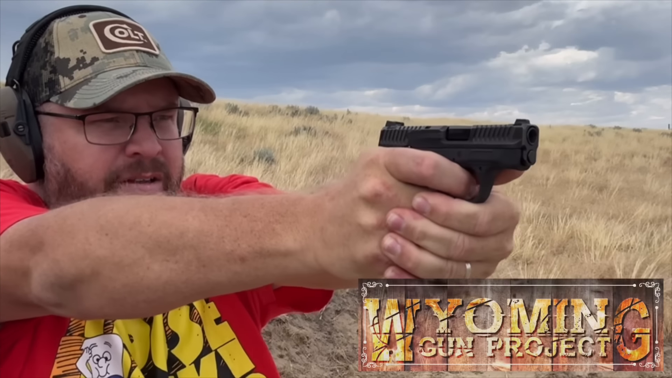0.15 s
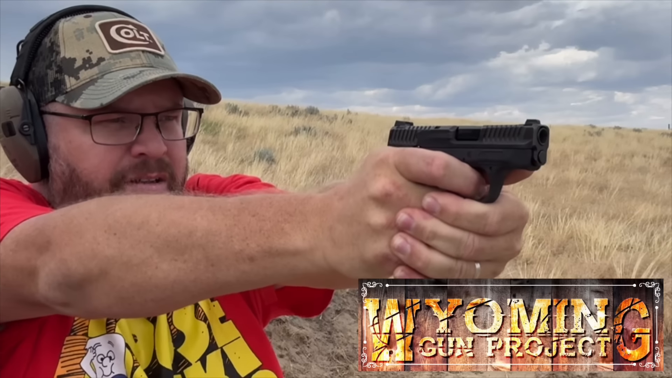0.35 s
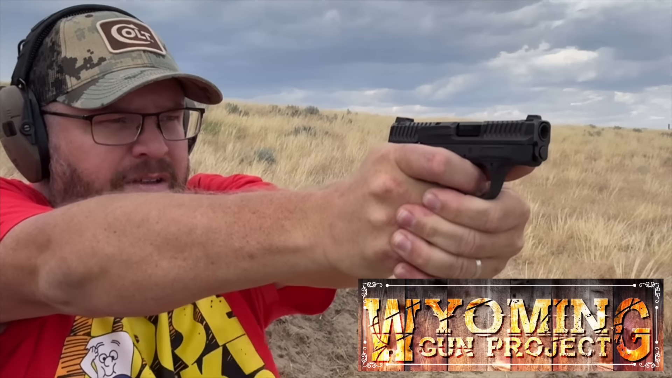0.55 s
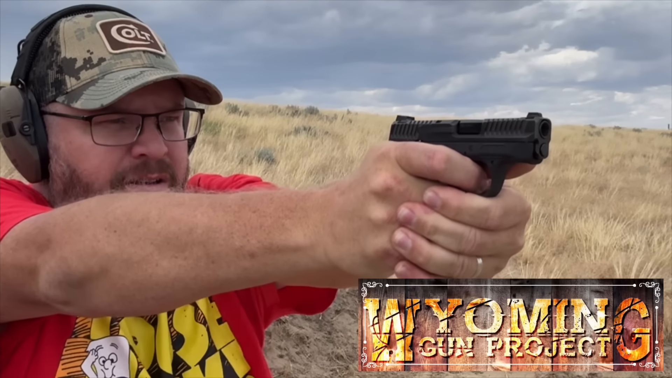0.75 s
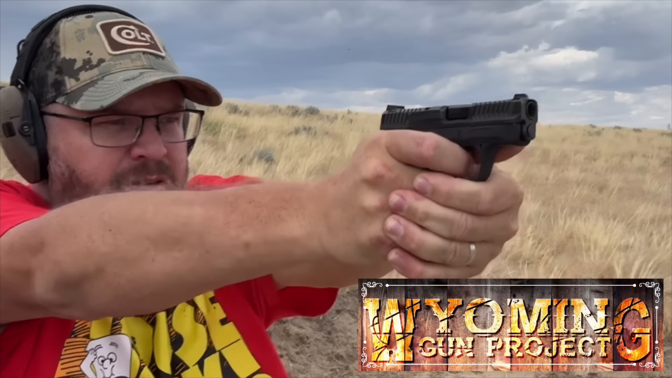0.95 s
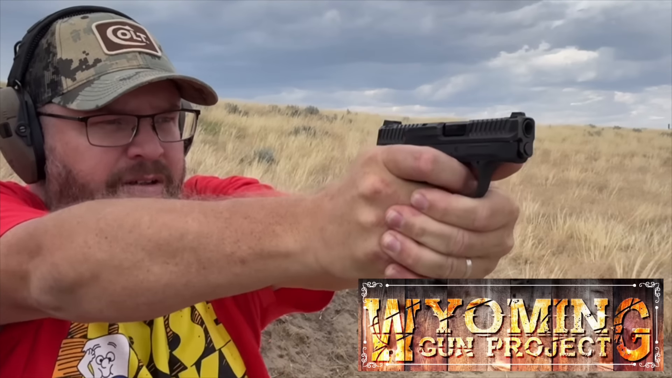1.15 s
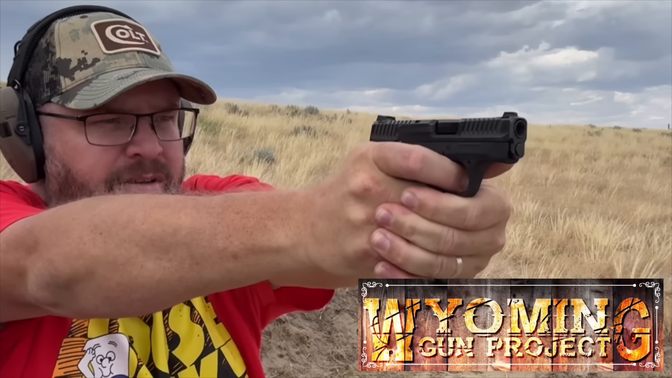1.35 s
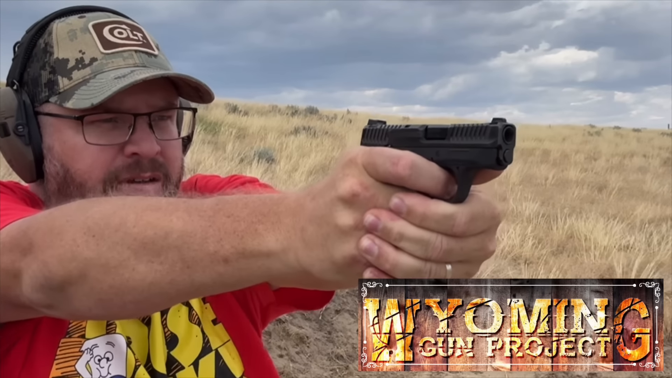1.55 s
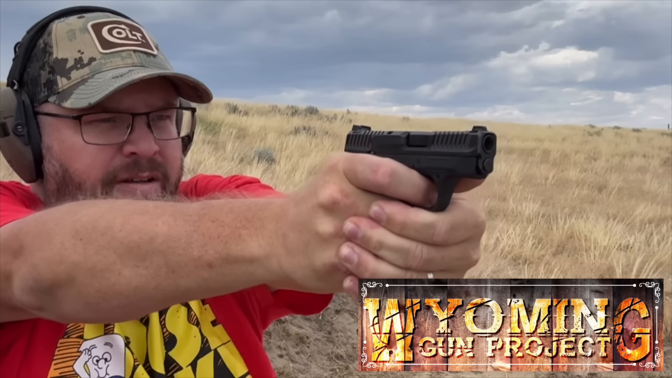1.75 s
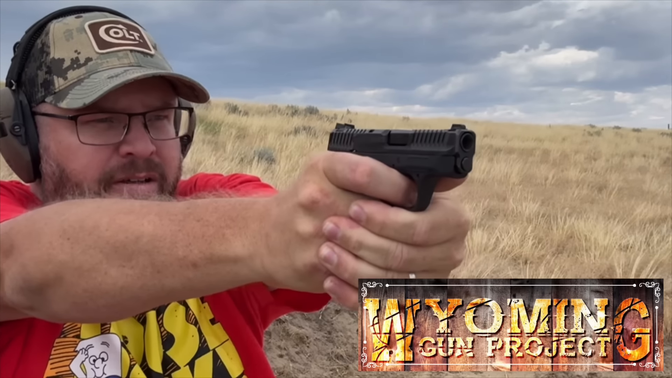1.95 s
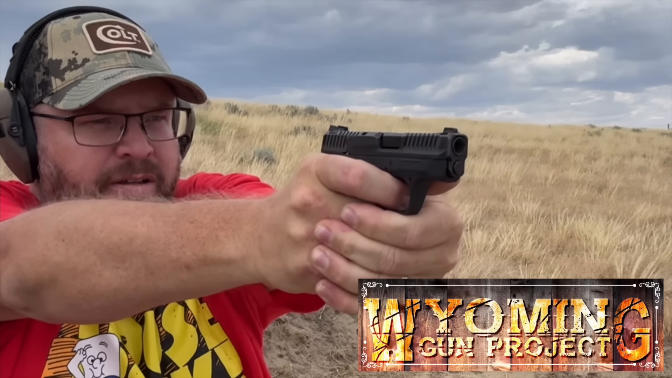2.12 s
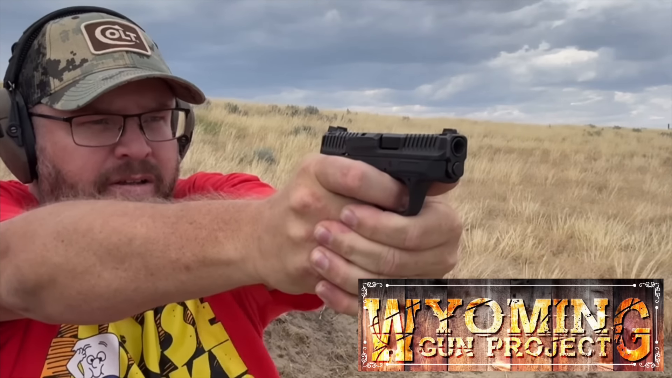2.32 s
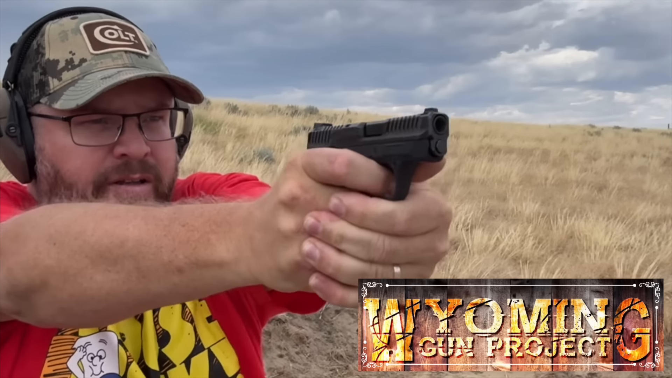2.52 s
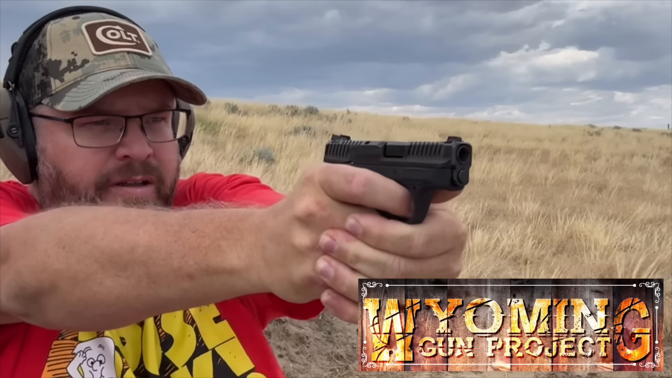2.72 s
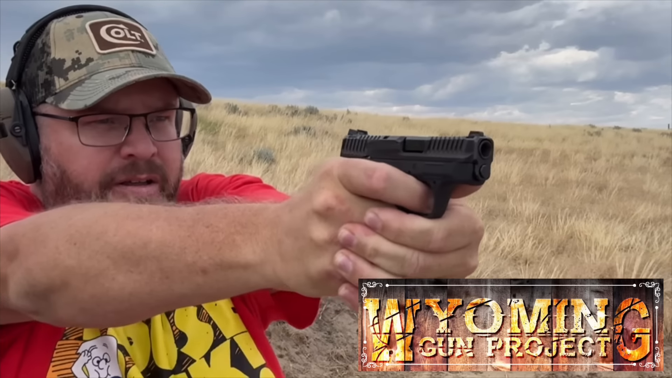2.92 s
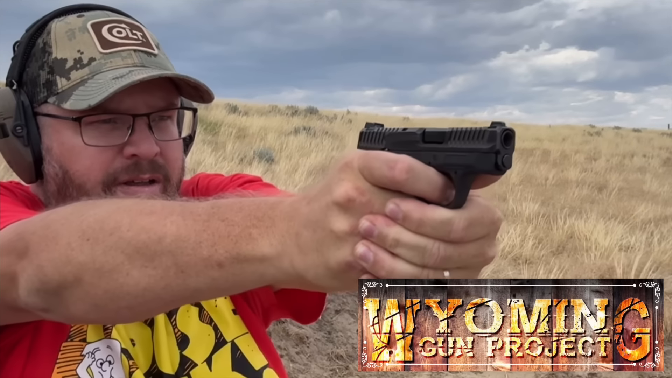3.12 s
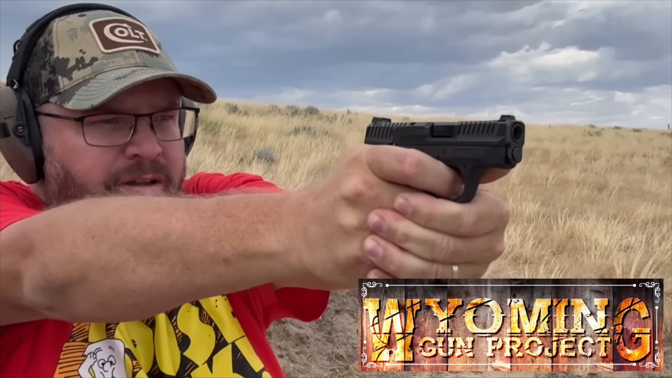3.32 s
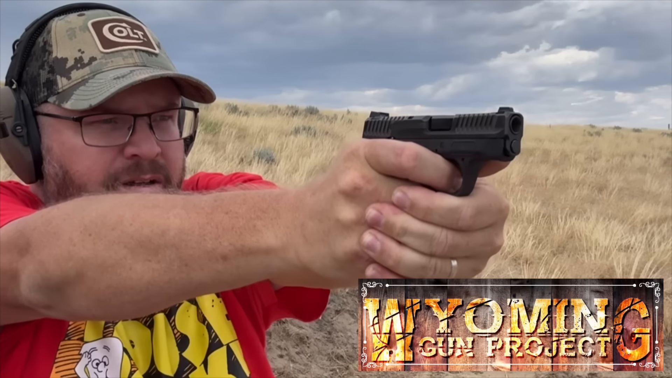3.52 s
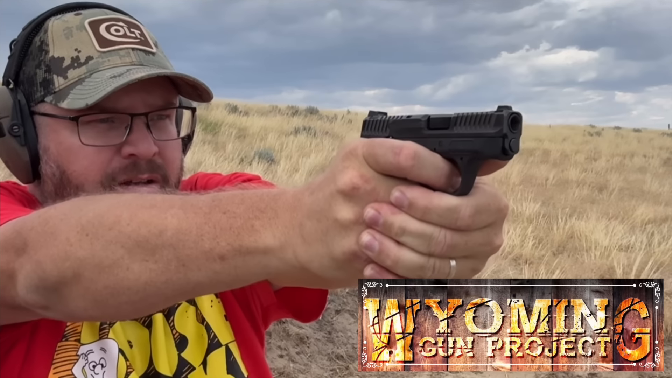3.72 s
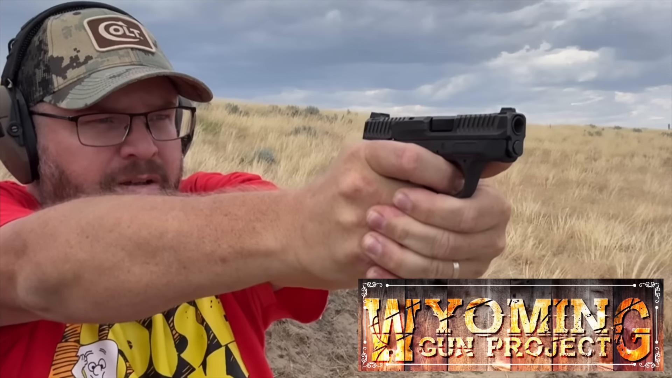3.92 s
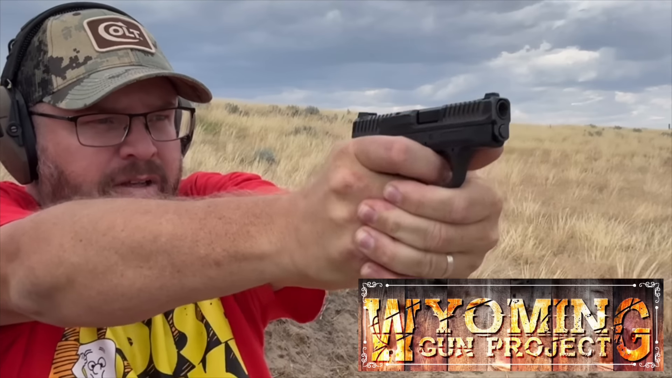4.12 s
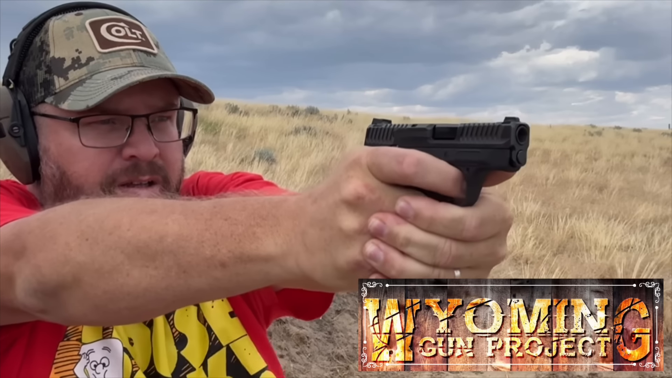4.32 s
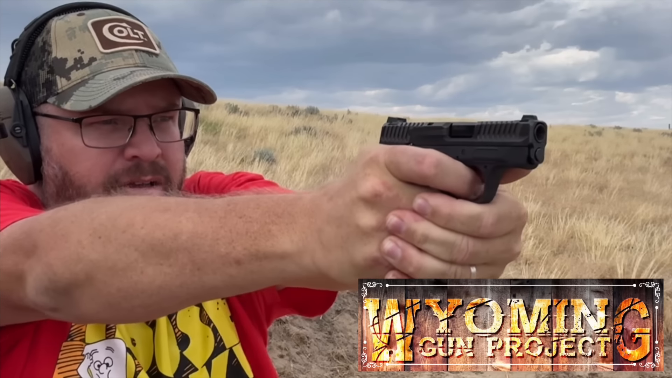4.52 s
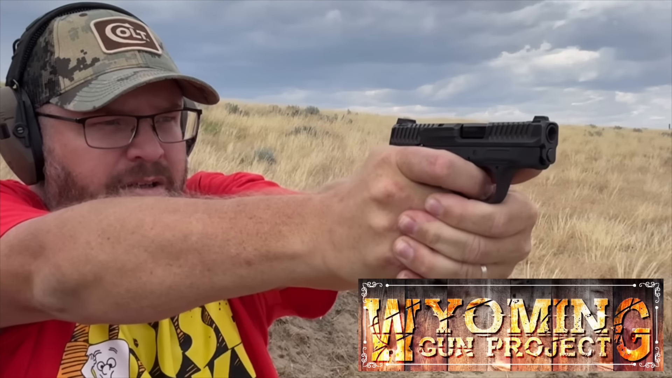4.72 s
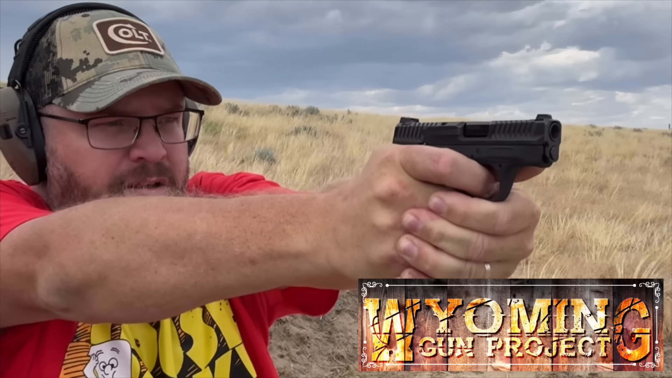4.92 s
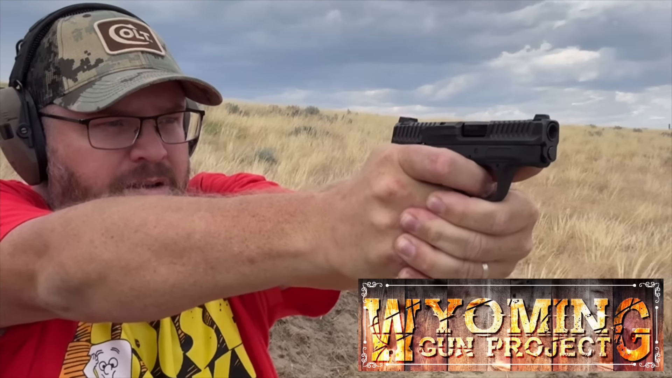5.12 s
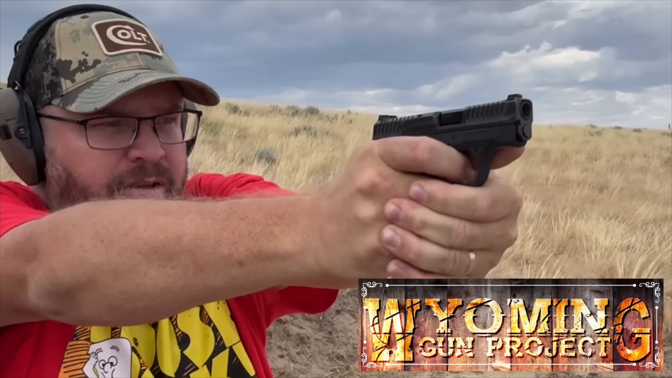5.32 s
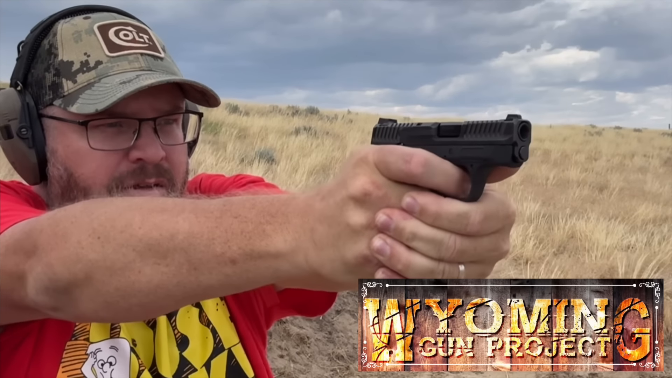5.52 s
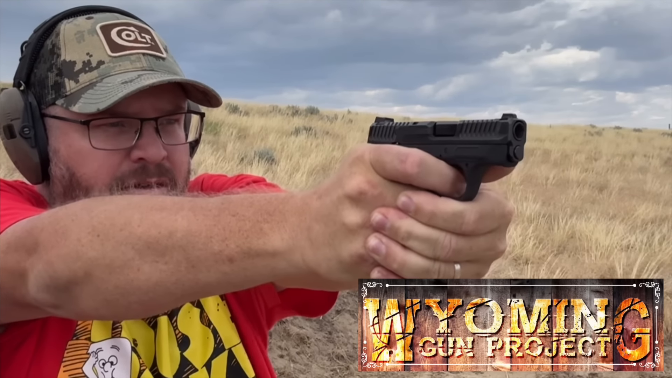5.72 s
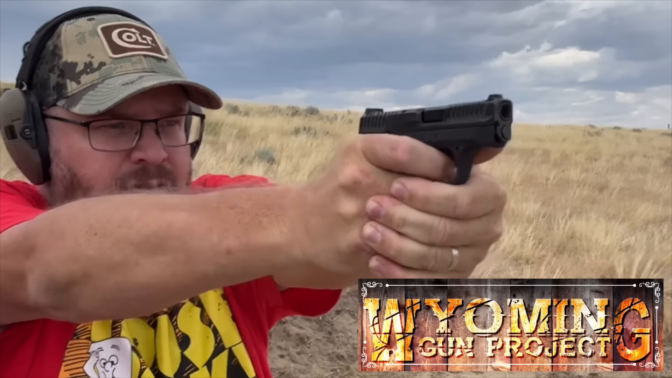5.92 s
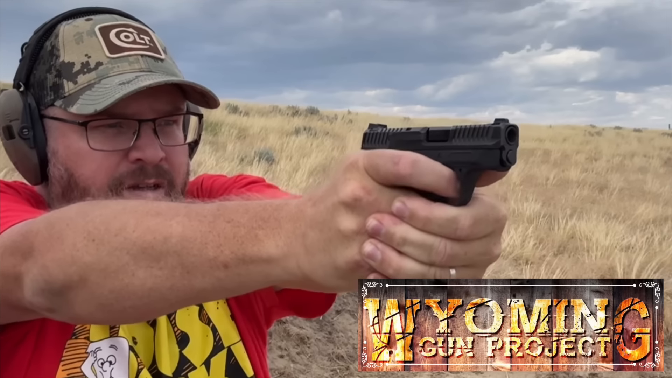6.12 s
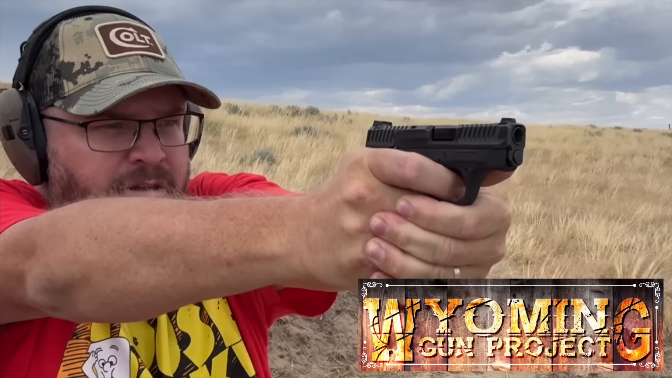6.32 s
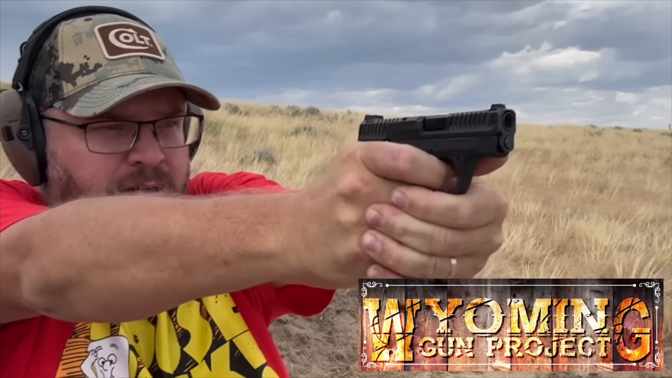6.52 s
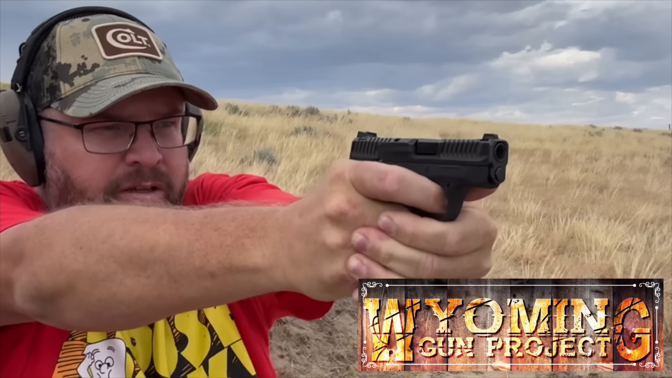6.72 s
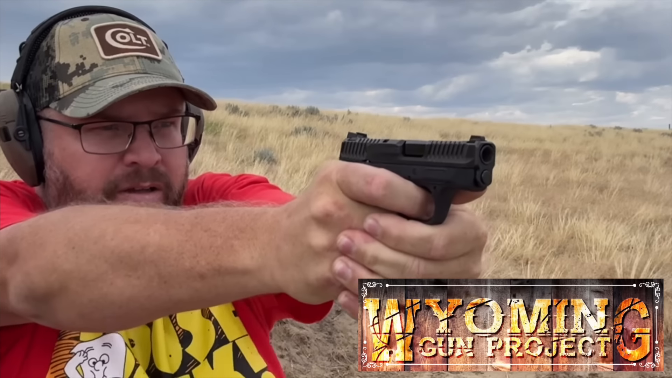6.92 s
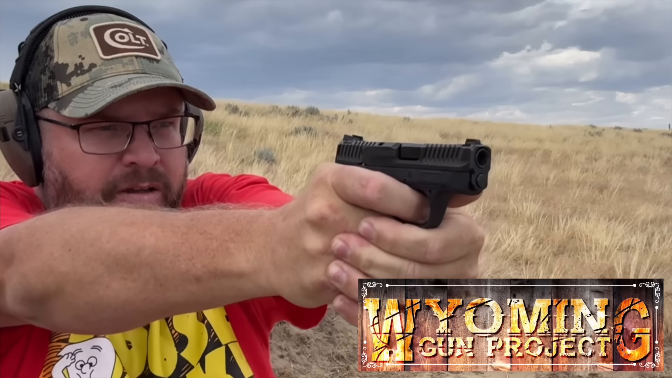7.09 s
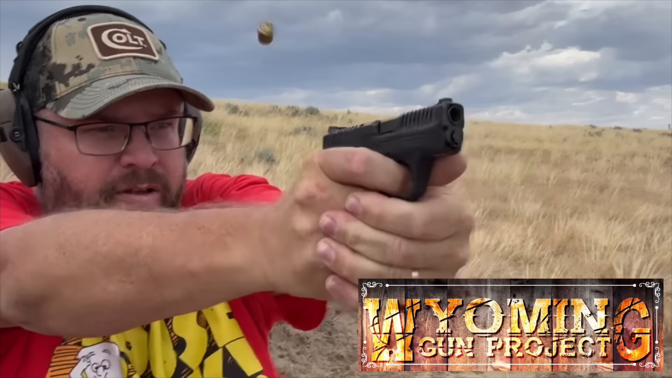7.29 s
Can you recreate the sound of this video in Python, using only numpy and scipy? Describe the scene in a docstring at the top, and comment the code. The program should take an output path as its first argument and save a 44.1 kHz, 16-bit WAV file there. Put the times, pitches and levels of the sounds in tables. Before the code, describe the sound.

A pistol fires seven loud, sharp shots on open grassland, slowly at first and then quicker. Each blast slightly overloads the close microphone and slaps back briefly from the ground. Five shots are followed at once by the snap and bright ring of a steel plate; the second only grazes and the last has no ring. Spent cases tick lightly, and low wind gusts buffet the microphone between shots.

```python
"""Pistol shots at a steel plate

Seven shots on open grassland overload a small, close microphone; each blast scatters back from
the ground and a bank. Five bullets shatter on a steel plate and ring its modes, and one grazes
its frame. Spent cases and fragments tick on the ground; gusts buffet the microphone."""
import sys
import numpy as np
from scipy import signal
from scipy.fft import rfft, irfft
from scipy.io import wavfile

SR = 44100
rng = np.random.default_rng(int(sys.argv[2]) if len(sys.argv) > 2 else 0)


def digitize_waveform(pressure):
    """Quantize a signal to 16-bit integers and store it at the path in sys.argv[1].

    Rows of a 2-D input are taken as channels; values are limited to [-1, 1].
    """
    field = np.atleast_2d(pressure).T
    bounded = np.clip(field, -1, 1)
    quanta = np.round(bounded * 32767).astype(np.int16)
    wavfile.write(sys.argv[1], SR, quanta)


N = 324135

# Muzzle blasts. Each row: start in seconds, gain in dB.
SHOTS = [(.959, -1), (2.3886, -1.5), (3.9774, 0), (5.176, -1), (5.924, -1), (6.4824, -1), (7.3048, -1)]
# Returns from the ground and objects further off. Each row: delay in seconds, 60 dB rise time in
# seconds, t60 in seconds, low, middle and treble gain in dB.
SCATTER = [(.003, .006, .14, 2, 16.5, 3), (.034, .09, .103, 8, 9, -27), (.0855, .042, .345, -22, -46, -70),
           (.1168, .003, .0135, -14, -12, -38), (.1213, .008, .05, -23, -58, -23),
           (.1343, .018, .06, -16, -9, -16), (.1469, .095, .0146, -54, -13, -70),
           (.1757, .25, .075, -16, -26, -88), (.2206, .026, 1.6, -58, -59, -99)]
# Single echoes. Each row: delay in seconds, gain in dB, pitch in Hz.
ECHOES = [(.066, -6, 500), (.0705, -2, 701), (.0765, -4, 808), (.0935, -3, 802), (0.1164, -4.5, 851),
          (0.1188, -6, 752), (0.1239, -9, 772), (.1325, 9.5, 430), (0.1347, 11, 448.4), (.139, 9.5, 767.7),
          (.1428, -7.25, 550), (.147, -7.5, 439.4), (.182, -20.5, 605.6), (.268, -34, 420)]
# Blast spectra. Each row: frequency in Hz, relative density in dB.
BODY_SPECTRUM = [(35, -36), (60, -11.5), (194, -6), (424, -0.5), (557, 4), (994, 1), (1490, -3),
                 (1740, -14), (2170, -20), (2670, -33), (3500, -34.5), (4550, -59), (7700, -120)]
TREBLE_SPECTRUM = [(1180, -31), (2000, 0.5), (2770, -12), (4540, -8.5), (12100, -22), (15600, -27),
                   (16400, -48.5)]
FRESH_SHARE = 0.37  # part of the body noise that changes from shot to shot
ROLL_DB, ROLL_T60_S = -44, 1.1


def gun():
    """The same ground answers every blast, so most scatter and all echoes repeat; far land rolls."""
    delay, rise, t60, *bands_db = np.transpose(SCATTER)[:, :, None]
    t = np.arange(-.002, .4, 1 / SR)
    shape_db = -60 * np.maximum((delay - t) / rise, (t - delay) / t60)
    shape_db = np.minimum(shape_db, 60 * (t - delay[0]) / rise[0])  # nothing returns before the blast
    envelopes = [gain_of(db + shape_db).sum(0) for db in bands_db]
    ground, echoes, out = noise(BODY_SPECTRUM, len(t)), np.zeros(len(t)), np.zeros(N)
    for lag, db, hz in ECHOES:
        add(echoes, lag - t[0], gain_of(db) * burst(hz, cycles=1.6))
    roll_db = ROLL_DB - 60 * np.arange(SR) / SR / ROLL_T60_S
    for start, db in SHOTS:
        body = np.sqrt(1 - FRESH_SHARE ** 2) * ground + FRESH_SHARE * noise(BODY_SPECTRUM, len(t))
        low = signal.filtfilt(*signal.butter(2, 750, fs=SR), body)
        bands = low, body - low, noise(TREBLE_SPECTRUM, len(t))
        scatter = sum(band * envelope for band, envelope in zip(bands, envelopes))
        add(out, start + t[0], gain_of(db) * (scatter + echoes))
        add(out, start, gain_of(db + roll_db) * noise(ROAR_SPECTRUM, SR))
    return out


# Hits on the plate. Each row: start in seconds, pitch factor.
HITS = [(1.119, 1.0008), (4.1333, .9998), (5.334, 1.0005), (6.0865, .9988), (6.643, .9995)]
# Ring length in seconds for each hit.
RING_S = [1.2, .95, .7, .5, .59]
# Plate mode frequencies in Hz.
MODE_HZ = [925, 970, 1550, 1562, 2078, 2440, 2710, 2920, 3171, 3957, 4412, 4567, 5290, 5654, 6182, 6650,
           6971, 7308, 7585, 7888, 8086, 8690, 8865, 9372, 9845, 10968, 11348, 11775, 12470, 15090]
# Ring of each mode. Each row: t60 in seconds, then excitation in dB for each of the five hits.
MODE_RING = [(0.14, -41, -14, -5, -24, -20.5), (1.2, -43, -55.5, -54, -52, -48),
             (0.9, -38.5, -13.5, -30.5, -8, -15.5), (0.82, -13, -19.5, -5, -28, -16),
             (4.3, -52, -63.5, -64, -15.5, -56.5), (1.1, -30, -61.5, -39.5, -35, -26),
             (0.3, -45, -52, -42, -49, -30), (0.8, -25, -43.5, -64.5, -38, -31.5),
             (0.48, -18.5, -42.5, -58.5, -35, -31.5), (0.35, -14.5, -21, -19.5, -37.5, -15.5),
             (0.75, -33, -32, -42, -27, -19), (0.25, -23, -15, -13, -17, -7),
             (0.29, -20, -30, -40, -24, -18), (0.35, -18.5, -23, -41, -30, -17),
             (0.2, -19, -33.5, -24, -26, -13.5), (0.24, -9, -30, -38.5, -23, -20),
             (0.32, -10.5, -29.5, -34.5, -8.5, -8), (1.0, -16, -50.5, -29.5, -17.5, -12.5),
             (0.17, -40, -40.5, -37, -23, -26.5), (0.22, -13.5, -27.5, -21, -20, -4),
             (0.067, -22.5, -34, -14, -37.5, -8.5), (0.15, -35, -35, -16, -29, -34.5),
             (0.2, -37.5, -34, -40, -17.5, -17.5), (0.54, -16, -60.5, -48, -28, -6.5),
             (0.5, -42, -55, -42.5, -34.5, -60.5), (0.55, -30, -60.5, -33, -37, -40),
             (0.4, -28, -50.5, -42, -34, -22), (0.4, -36, -40, -53.5, -72, -36),
             (0.24, -55.5, -48, -48, -87.5, -51), (0.25, -30.5, -40.5, -47.5, -57.5, -70.5)]
# Ring contour per hit, before each mode's weight. Each row, for low then high modes: offset in dB,
# early fade time in seconds, early fade in dB, waver rate in Hz, depth in dB, phase in cycles.
CONTOURS = [
    [(5, .27, -20, 4.06, 5, .41), (-5.5, .5, -24, 5.5, 2.5, .06)],
    [(-6, .5, -9, 1.45, 9, .88), (-4.5, .42, -26.5, 3.5, 4.3, .39)],
    [(-5.5, .46, -19.5, 4.9, 2, .82), (-2, .44, -13, 4.67, 4.2, .8)],
    [(6.5, .26, -38, 3.73, 4, .28), (-3, .21, -14, 2.24, 7.5, .68)],
    [(1.1, .27, -21, 6.14, 2.5, .72), (-9, .99, -29, 3.63, 11, .86)],
]
LOW_WEIGHT, HIGH_WEIGHT = 1.08, .92  # how strongly a mode's level follows the contour
BROAD_WEIGHT, BROAD_HZ = .45, (970, 2078, 10968)  # broadly radiating modes


def plate():
    """Steel modes ring down from each hit; their levels waver and the high ones flutter."""
    hz, (t60, *hits_db) = np.array(MODE_HZ)[:, None], np.transpose(MODE_RING)[:, :, None]
    sign = np.where(np.diff(hz, prepend=0, axis=0) < 30, -1, 1)  # a beating twin starts in antiphase
    high = np.clip(np.log(hz / 2600) / np.log(2.7), 0, 1)  # 0 for low modes, 1 for high
    weight = np.where(np.isin(hz, BROAD_HZ), BROAD_WEIGHT, (1 - high) * LOW_WEIGHT + high * HIGH_WEIGHT)
    out = np.zeros(N)
    for (start, pitch), db, length, (low_contour, high_contour) in zip(HITS, hits_db, RING_S, CONTOURS):
        t = np.arange(0, length, 1 / SR)
        shape_db = (1 - high) * contour_db(t, *low_contour) + high * contour_db(t, *high_contour)
        rate, phase = rng.random((2, 3, len(hz), 1))
        flutter_db = 2.1 * np.sqrt(high) * np.sin(2 * np.pi * ((5 + 22 * rate) * t + phase)).sum(0)
        attack = np.minimum(hz * t / 12, 1)
        envelope = attack * gain_of(db - 60 * t / t60 + weight * shape_db + flutter_db)
        modes = sign * envelope * np.sin(2 * np.pi * pitch * hz * t)
        add(out, start, modes.sum(0) * signal.windows.tukey(len(t), .004))
    return out


def contour_db(t, offset_db, fade_s, fade_db, waver_hz, waver_db, phase):
    """The ring fades quickly at first, then lingers while its level wavers."""
    fade = np.sin(np.pi / 2 * np.minimum(t / fade_s, 1)) ** 2
    return offset_db + fade_db * fade + waver_db * np.cos(2 * np.pi * (waver_hz * t + phase))


# Relative clang level in dB for each hit.
CLANG_DB = [-12.5, -15.5, -16.5, -17.5, -11]
# Spectrum of the plate's small modes. Each row: frequency in Hz, relative level in dB.
CLANG_SPECTRUM = [(700, -15), (1500, 0.5), (4000, -4.94), (8000, 0.5), (12000, -11.5), (16000, -22)]


def clang():
    """Many small plate modes die quickly; each hit drives them unevenly, over a fading hiss."""
    place, life = rng.random((2, 300, 1))
    hz, t60 = 700 + 15000 * place ** 2.5, .05 + .22 * life ** 2
    out, t = np.zeros(N), np.arange(12000) / SR
    points_hz, points_db = np.transpose(CLANG_SPECTRUM)
    mode_db = np.interp(np.log(hz), np.log(points_hz), points_db)
    modes = gain_of(mode_db - 60 * t / t60) * np.sin(2 * np.pi * hz * t)
    for (start, _), db in zip(HITS, CLANG_DB):
        drive = rng.standard_normal(len(hz)) ** 3 / np.sqrt(15 * len(hz))  # a few modes stand out
        add(out, start, gain_of(db + 9) * (drive @ modes))
        add(out, start, gain_of(db - 6.5 - 60 * t / .185) * noise(CLANG_SPECTRUM, len(t)))
    return out


# Bullet impacts; the second misses the plate. Each row: start in seconds, snap level in dB.
CRACKS = [(1.1184, -4.5), (2.5535, -11), (4.1335, -1.5), (5.3353, -4), (6.089, -29), (6.6428, -2)]


def cracks():
    """Each bullet shatters: a sharp snap and a fading spray of fragments."""
    out, t = np.zeros(N), np.arange(6000) / SR
    spray_spectrum = [(1500, -20), (3200, 1.5), (6000, 3.9), (10000, -10), (16000, -27.5)]
    snap, spray = gain_of(-60 * t / .0053), gain_of(-22 - 60 * t / .06)
    for start, db in CRACKS:
        add(out, start, gain_of(db) * (snap + spray) * noise(spray_spectrum, len(t)))
    return out


# Modes of the plate's frame. Each row: frequency in Hz, peak in dB, t60 in seconds.
FRAME_MODES = [(1310, -47, .45), (1610, -50, .35)]


def frame():
    """Grazed by the second bullet, the frame rings faintly."""
    out, t = np.zeros(N), np.arange(15000) / SR
    for hz, db, t60 in FRAME_MODES:
        add(out, CRACKS[1][0], gain_of(db - 60 * t / t60) * np.sin(2 * np.pi * hz * t))
    return out


# Spent cases and fragments. Each row: start in seconds, level in dB, pitch in Hz.
TICKS = [(1.2245, -14.5, 5800), (1.6013, -50, 6800), (2.6308, -19.5, 5650), (4.2262, -15.5, 5670),
         (5.4056, -15, 5600)]


def ticks():
    """Light brass or lead lands: a few bright cycles and a short rattle."""
    out, t = np.zeros(N), np.arange(1500) / SR
    rattle_spectrum = [(1500, -22), (4000, 6), (6000, 11.5), (10000, -1), (15000, -30)]
    decay = gain_of(-8 - 60 * t / .016) + gain_of(-25 - 60 * t / .072)
    for start, db, hz in TICKS:
        add(out, start, gain_of(db) * burst(hz, cycles=4.3))
        add(out, start, gain_of(db) * decay * noise(rattle_spectrum, len(t)))
    return out


# A faint thump. Each row: start in seconds, level in dB.
THUMPS = [(6.993, -47.5)]


def thump():
    """A dull puff of noise with a soft attack."""
    out, t = np.zeros(N), np.arange(5000) / SR
    attack = np.minimum(t / .0047, 1)
    for start, db in THUMPS:
        add(out, start, gain_of(db - 60 * t / .19) * attack * noise(BODY_SPECTRUM, len(t)))
    return out


# Gusts on the microphone. Each row: time in seconds, base rumble level in dB.
GUSTS = [(0.0, -62), (0.16, -41), (0.29, -43), (0.39, -61), (0.61, -66), (0.8, -30), (0.94, -40),
         (1.08, -33), (1.25, -35), (1.32, -48), (1.42, -37), (1.95, -33), (2.09, -37), (2.14, -50),
         (2.24, -33), (2.56, -28), (2.66, -48), (2.97, -33.5), (3.13, -53.5), (3.85, -68), (4.1, -54),
         (4.42, -63), (4.95, -62.5), (5.3, -51.5), (5.71, -31), (6.08, -32), (6.18, -55), (6.76, -70),
         (7.35, -60)]
# Wind spectra; the roar also colours the gun's roll. Each row: frequency in Hz, relative density in dB.
RUMBLE_SPECTRUM = [(8.8, -35), (15, -4.5), (43, 2.5), (114, -2.5), (171, -10.5), (282, -25), (413, -34.5),
                   (500, -31.5), (650, -61), (1100, -120)]
ROAR_SPECTRUM = [(120, -22.5), (200, -6), (413, -22.5), (463, -17), (1120, -28.5), (2140, -32.5),
                 (2210, -57.5), (3000, -59), (3900, -86.5), (6600, -120)]
ROAR_DB, ROAR_DB_PER_GUST_DB = -45, .4


def wind():
    """Lumpy rumble and a thinner roar follow the gusts; both jump with the same small eddies."""
    gust_db = np.interp(np.arange(N) / SR, *np.transpose(GUSTS))
    eddies = noise([(2, -5.5), (5, 1.37), (15, 0), (40, -18)], N)
    rumble = noise(RUMBLE_SPECTRUM, N) * gain_of(gust_db + 2.6 * eddies)
    roar = noise(ROAR_SPECTRUM, N) * gain_of(ROAR_DB + ROAR_DB_PER_GUST_DB * gust_db + 3.1 * eddies)
    return rumble + roar


# Single wind buffets. Each row: start in seconds, slap level in dB.
BUFFETS = [(0.116, -38.5), (0.266, -29), (0.778, -24.5), (1.384, -19.5), (1.515, -24), (1.888, -24.5),
           (2.047, -20.5), (2.277, -21), (2.867, -17.5), (3.02, -28.5), (3.499, -31.5), (4.382, -44.5),
           (4.701, -47.5), (4.941, -42.5), (5.443, -31), (5.619, -28), (5.751, -20.5), (6.963, -49)]


def buffets():
    """Pressure slaps the capsule inside a short swell of rumble."""
    out = np.zeros(N)
    for start, db in BUFFETS:
        add(out, start, gain_of(db) * burst(hz=89, cycles=1.8))
        add(out, start - .02, gain_of(db - 7) * np.hanning(4000) * noise(RUMBLE_SPECTRUM, 4000))
    return out


def hiss(level_db=-70.5):
    """A faint, dull, steady noise floor."""
    spectrum = [(150, -5.5), (450, -.54), (1700, -11.5), (2200, -29), (16000, -39)]
    return gain_of(level_db) * noise(spectrum, N)


def gain_of(db):
    return 10 ** (np.asarray(db) / 20)


def noise(spectrum, size):
    """Noise of rms 1, coloured by (Hz, relative dB) points."""
    points_hz, points_db = np.transpose(spectrum)
    hz = np.fft.rfftfreq(size, 1 / SR)
    colour = gain_of(np.interp(np.log(hz + 1), np.log(points_hz + 1), points_db, -90, -90))
    coloured = irfft(rfft(rng.standard_normal(size)) * colour, size)
    return coloured / np.sqrt(np.mean(coloured ** 2) + 1e-20)


def burst(hz, cycles):
    """A few sine cycles under a smooth bump."""
    progress = np.linspace(0, 1, int(cycles * SR / hz))
    return np.sin(2 * np.pi * cycles * progress) * np.sin(np.pi * progress)


def add(mix, start_s, sound):
    part = mix[round(start_s * SR):][:len(sound)]
    part += sound[:len(part)]


def scene():
    """Mono mix at the microphone; moving air roughens the plate's far ring."""
    floor = hiss()
    moving_air = 1 + .09 * noise([(6, -4), (30, .1), (200, -16)], N)
    far = moving_air * plate() + clang() + cracks() + frame() + thump()
    return (gun() + far + ticks() + wind() + buffets() + floor)[None]


def record(dry):
    """The capsule overloads with a rounded knee; coupling sags the flat tops; then a low-pass."""
    ceiling, knee = .86, 5.5
    coupling_hz, edge_hz = 45, 16000
    squashed = dry / (1 + abs(dry / ceiling) ** knee) ** (1 / knee)
    coupled = signal.lfilter(*signal.butter(1, coupling_hz, "high", fs=SR), squashed)
    low_pass = signal.firwin(511, edge_hz, window=("kaiser", 9), fs=SR)
    return signal.oaconvolve(coupled, low_pass[None], "same")


dry = scene()
out = record(dry)
digitize_waveform(out)
```